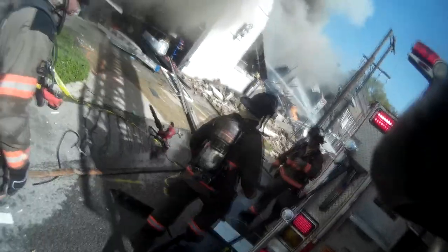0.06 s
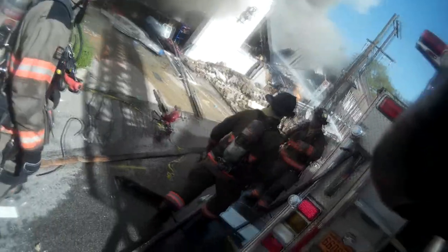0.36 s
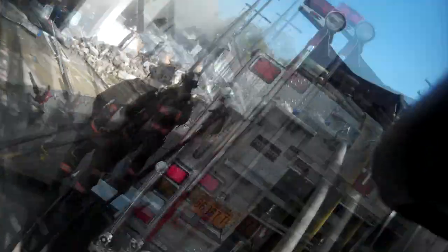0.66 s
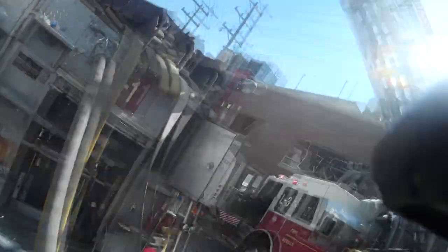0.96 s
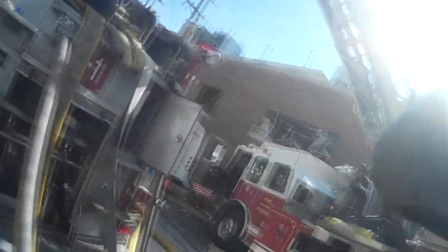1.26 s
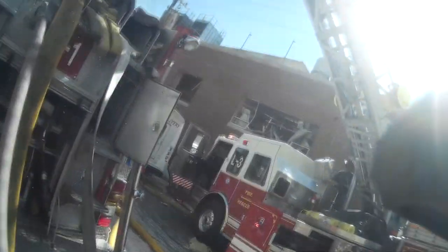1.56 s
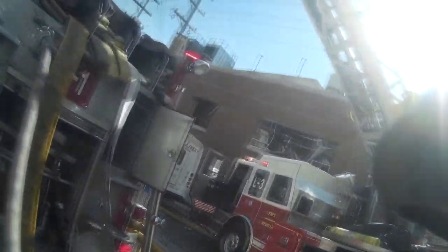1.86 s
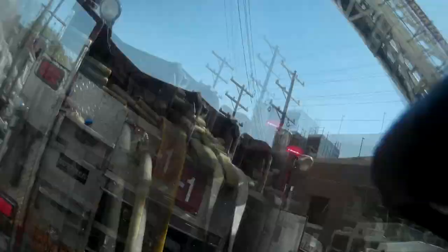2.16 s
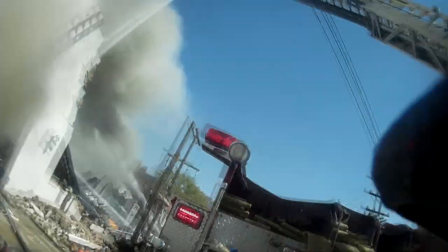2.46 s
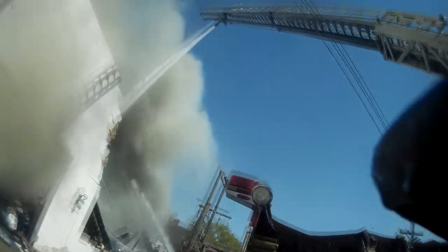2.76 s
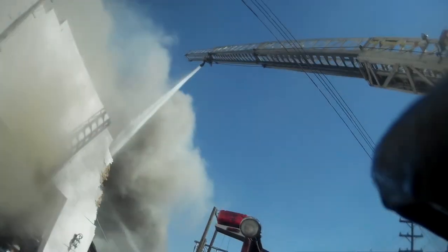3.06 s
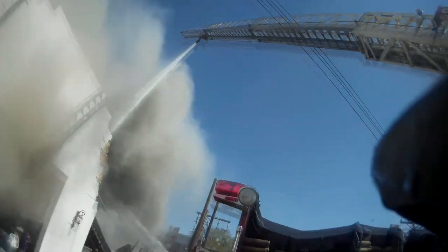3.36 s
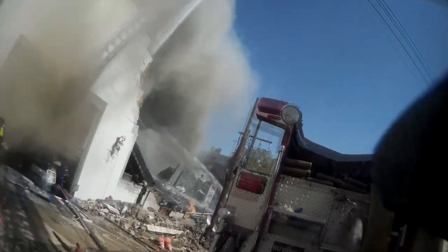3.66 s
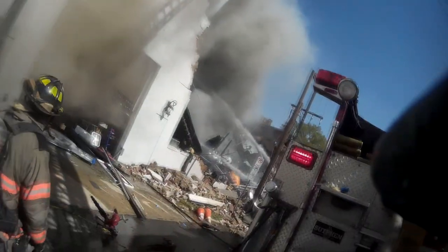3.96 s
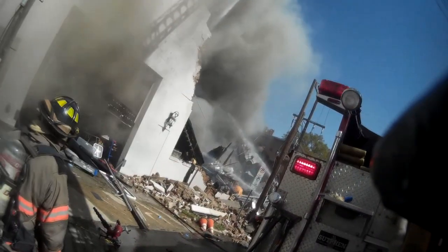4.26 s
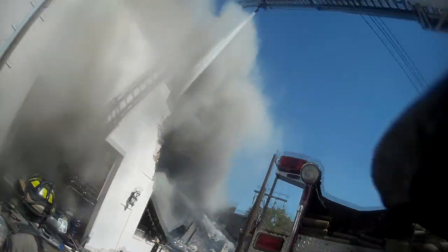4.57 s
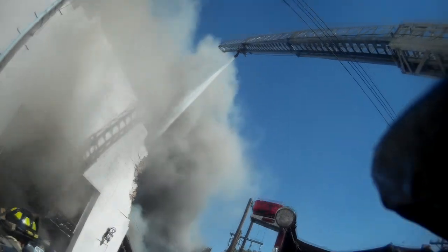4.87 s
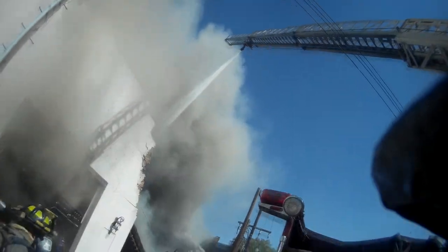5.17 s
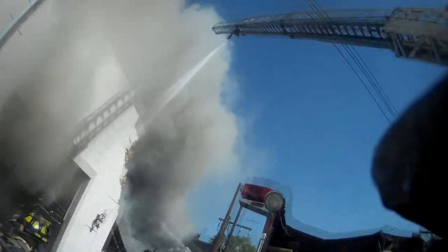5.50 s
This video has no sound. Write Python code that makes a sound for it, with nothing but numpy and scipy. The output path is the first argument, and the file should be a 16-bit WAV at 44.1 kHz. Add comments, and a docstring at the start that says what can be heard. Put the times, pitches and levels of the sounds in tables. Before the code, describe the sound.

Two diesel fire engines idle fast beside a burning building, their low drone throbbing over rumble, clatter and a steady pump hum. A thin gear whine dips after about a second and returns stronger midway. Equipment clinks lightly, a faint, shrill alarm buzzer comes and goes, and a distant hose hisses. The body-worn microphone turns, shifting the tone a little, and everything is on the right channel only.

```python
"""Beside a burning building, two six-cylinder diesel fire engines idle fast to drive their water pumps.
Their exhaust notes drift in and out of step and throb, over rumble, injector clatter, a pump hum and
whining gears. Equipment clinks, a faint, shrill alarm buzzer comes and goes, and a distant hose hisses.
The microphone is worn by someone who turns from the fire to the trucks and back, so their body
shields each sound by a changing amount. Everything is heard on the right channel only."""
import sys
import numpy as np
from scipy import signal
from scipy.fft import rfft, irfft
from scipy.io import wavfile

SR = 44100
rng = np.random.default_rng(int(sys.argv[2]) if len(sys.argv) > 2 else 0)


def output_pcm(signal):
    """Save a mono or channel-first signal as 16-bit PCM at the path in sys.argv[1].

    Samples are clipped to [-1, 1] before scaling.
    """
    pcm = np.clip(np.atleast_2d(signal).T, -1, 1) * 32767
    wavfile.write(sys.argv[1], SR, np.round(pcm).astype(np.int16))


N = 248459
TIME = np.arange(N) / SR
NEAR_CYCLE_HZ, FAR_CYCLE_HZ = 10.445, 10.295  # one engine cycle is two turns of the shaft

# exhaust tones of each engine: (multiple of the cycle rate, level [dB])
NEAR_EXHAUST_TONES = [(4, -59), (6, -36.5), (7, -61), (8, -61), (9, -50), (10, -52.5), (12, -44.5),
                      (13, -53), (17, -61)]
FAR_EXHAUST_TONES = [(3, -63.5), (7, -55.5), (8, -54), (9, -44.5), (10, -56.5), (11, -56), (12, -49),
                     (14, -57), (15, -58.5), (18, -51.5), (20, -43), (22, -65.5), (24, -68.5), (28, -58.5),
                     (29, -49), (30, -52), (32, -52.5), (40, -61), (60, -74.5)]
# slow change in the near exhaust as the wearer moves: (time [s], level change [dB])
NEAR_EXHAUST_LEVEL = [(0, 0), (1.3, 1.8), (2.3, 2.5), (2.9, 3), (3.6, 1), (4.1, 0), (5.63, 2)]
# tone colours of the engine noises: (frequency [Hz], relative level [dB])
RUMBLE_COLOUR = [(8, -18), (25, -13.5), (45, -6.5), (70, -4.5), (105, -5.5), (128, -3), (155, -3), (220, 0),
                 (295, -5.5), (350, -13), (450, -25)]
BLOCK_COLOUR = [(260, -6), (350, 2.5), (440, 2), (550, -2), (680, -9.5), (820, -20.5), (1200, -41)]
CASING_COLOUR = [(600, -31.5), (820, -13), (1000, -7.5), (1150, -2), (1300, 0.5), (1450, -0.5), (1600, -5),
                 (1750, -4.5), (1900, -16.5), (2300, -35.5)]
COVER_COLOUR = [(1600, -19.5), (1850, -5), (2000, -2), (2150, -2), (2380, -8.5), (2580, -6), (2720, -17.5),
                (2900, -31.5), (3100, -42)]
INJECTOR_COLOUR = [(2900, -23.5), (3100, -13), (3380, 1), (3750, -4.5), (4050, -11), (4500, -29)]
# main gear whine, well shielded when the wearer faces the trucks: (time [s], level [dB])
WHINE_LEVEL = [(0, -51.5), (0.4, -56.5), (0.76, -61), (1.1, -69), (2.27, -65), (2.39, -55), (2.68, -54.5),
               (2.8, -49.5), (3.04, -52), (3.26, -52.3), (3.52, -52.5), (4.0, -57), (4.27, -54.5),
               (4.55, -53.5), (4.85, -53), (5.2, -53), (5.63, -53.3)]
# weaker gear tones: (multiple of the tooth rate, level facing trucks [dB], level facing fire [dB])
GEAR_TONES = [(1, -68, -76.5), (3, -71, -78.5), (4, -72.5, -76), (5, -99, -88)]
# the other truck's gear whine: (time [s], level [dB])
OTHER_WHINE_LEVEL = [(0, -80), (0.35, -60.5), (0.95, -60.5), (1.3, -67), (1.9, -60.5), (2.3, -76),
                     (3.05, -69), (3.4, -71)]
# light knocks of equipment: (time [s], pitch [Hz], level [dB], fade time [s])
EQUIPMENT_CLINKS = [(.578, 1730, -50, .008), (0.677, 1300, -44, 0.0055), (0.677, 1680, -46.5, 0.004),
                    (0.737, 1330, -50, .014), (.771, 1470, -55, 0.0092), (.846, 2180, -52, 0.032),
                    (.864, 1900, -55, 0.01), (1.622, 8500, -73, .007), (3.036, 2500, -52, 0.0058),
                    (3.066, 2250, -54, 0.022), (3.06, 7120, -79, .04), (3.092, 1340, -50, .01),
                    (3.494, 3740, -59, 0.011), (3.501, 2190, -53, 0.0055), (3.578, 1290, -52, 0.0058)]
# faint machinery tones: (pitch [Hz], level facing trucks [dB], level facing fire [dB])
MACHINERY_TONES = [(540, -65.5, -63), (861, -67, -76.5), (896, -71, -76.5), (1149, -77, -70.5),
                   (1284, -76, -71), (1641, -73, -69.5), (1810, -70, -74.5), (3900, -89, -86),
                   (3970, -93, -89.5)]
# buzzer blasts: (start [s], level [dB], boost where the buzzer rings most [dB])
BUZZER_BLASTS = [(-.15, -65, 5), (1.87, -66.5, -2), (2.78, -66.5, 2), (3.735, -67, 7.5)]
# overtones that the buzzer's disc lets through: (multiple of the buzz rate, relative level [dB])
BUZZER_TONES = [(50, -9.5), (51, -16), (52, -12), (53, -13.5), (54, -9), (55, -7), (56, -10), (57, -8.5),
                (58, -8.5), (59, -13.5), (60, -16.5)]
# tone colour of the hose stream: (frequency [Hz], relative level [dB])
WATER_COLOUR = [(1000, 0), (3000, 2), (4700, -1.5), (5600, -1.5), (7000, -3), (10000, -5), (13000, -7),
                (15500, -10)]
# the machinery swells and sags together: (time [s], level change at depth 1 [dB])
SHARED_SWELL = [(0.0, -4), (0.22, -2.1), (0.42, 2), (0.52, -1), (0.6, 1), (0.7, -4), (0.76, 1.5),
                (0.81, -1), (0.9, 1), (1.1, 0.5), (1.45, 1), (1.8, -0.5), (1.99, 2), (2.16, -1.5), (2.3, 0),
                (2.51, 0.5), (2.7, -1.3), (2.8, -3.5), (2.88, 0.5), (3.08, 1.5), (3.27, -3), (3.39, -2.5),
                (3.49, 0.5), (3.98, -0.4), (4.11, 0), (4.23, -3.5), (4.38, -1.1), (4.57, 3), (4.66, 0.5),
                (4.78, 0), (5.08, -1), (5.18, -2.5), (5.41, 2), (5.58, -1.3)]
# which way the wearer faces: (time [s], direction [0 = fire, 1 = trucks])
WEARER_TURN = [(.6, 0.16), (1.0, 0.88), (2.15, 0.4), (2.4, 0)]


def exhaust(cycles, tones, waver_db, shake=0.25):
    """Unequal cylinders make a stack of tones; uneven burning shakes all but the firing note."""
    sound = 0
    for multiple, db in tones:
        depth = 0 if multiple == 6 else shake  # six firings per cycle make the firing note
        level = undb(db + waver_db * wander(6.1)) * (1 + depth * wander(13.2))
        sound += level * tone(multiple * cycles + depth * wander(9) / (2 * np.pi))
    return sound


def both_exhausts(near_cycles, far_cycles, throb_hz=0.95, throb_db=0.7, first_peak_s=0.25):
    """The two exhausts drone; the near one throbs as their firing notes go in and out of step."""
    throb = undb(throb_db * np.cos(2 * np.pi * throb_hz * (TIME - first_peak_s)))
    near_level = throb * undb(curve(NEAR_EXHAUST_LEVEL)) * swell(depth=0.5)
    near = near_level * exhaust(near_cycles, NEAR_EXHAUST_TONES, waver_db=0.46)
    far = swell(depth=0.45) * exhaust(far_cycles, FAR_EXHAUST_TONES, waver_db=1.76)
    return near + far


def engine_noise(cycles, scatter_db=0.6):
    """Exhaust gas and the engine block rumble; injectors and valves strike and make the metal ring."""
    puffs = 1 + 0.31 * np.cos(2 * np.pi * 6 * cycles)  # one puff per firing
    strikes = 1 + 0.13 * np.cos(2 * np.pi * 12 * cycles)  # two strikes per firing
    strikes *= undb(scatter_db * wander(63))
    # bass bends round the wearer, so turning does not change it
    rumble = undb(-41) * swell(depth=0.97) * colour(noise() * puffs, RUMBLE_COLOUR)
    block_level = facing(trucks_db=-52.5, fire_db=-49.5) * swell(depth=1) * undb(wander(24))
    block = block_level * colour(noise(), BLOCK_COLOUR)
    clatter = noise() * undb(scatter_db * wander(59))
    casing = facing(trucks_db=-54.5, fire_db=-52) * colour(clatter, CASING_COLOUR)
    covers = facing(trucks_db=-57.5, fire_db=-58.5) * colour(noise() * strikes, COVER_COLOUR)
    injectors = facing(trucks_db=-68, fire_db=-70) * colour(noise() * strikes, INJECTOR_COLOUR)
    shared_shake = swell(depth=1.07) * undb(0.9 * wander(30))
    return rumble + block + shared_shake * (casing + covers + injectors)


def pump(hum_hz=270.1, waver_db=1.0):
    """The pump's spinning blades hum on one steady note."""
    level = facing(trucks_db=-38, fire_db=-33.5) * swell(depth=0.84) * undb(waver_db * wander(18))
    return level * tone(count_cycles(hum_hz, drift=0.00094, rate=6.1))


def gears(engine_cycles, tooth_hz=844.2, boost_db=1.0):
    """Gear teeth whine, mostly at twice the rate they meet; the unevenly turning shaft adds a wobble."""
    wobble = 0.0185 * np.sin(2 * np.pi * 4 * engine_cycles)
    teeth = count_cycles(tooth_hz, drift=0.00088, rate=12.7)
    whine = undb(boost_db + curve(WHINE_LEVEL)) * swell(depth=1.2) * tone(2 * (teeth + wobble))
    weak_tones = sum(facing(trucks_db, fire_db) * tone(multiple * teeth)
                     for multiple, trucks_db, fire_db in GEAR_TONES)
    flutter = 1 + 0.15 * wander(60)
    return (whine + weak_tones) * flutter


def other_gears(whine_hz=1715, waver_db=0.5):
    """The other truck's gears whine a little higher and beat against the main whine."""
    level = undb(curve(OTHER_WHINE_LEVEL) - waver_db * wander(14))
    return level * tone(count_cycles(whine_hz, drift=0.0013, rate=15))


def clinks(rise_s=0.004, spread=0.077):
    """Each light, cushioned knock rings in a narrow band of pitches and dies quickly."""
    band_shape = [(-2, -26), (-0.5, 0), (0.5, 0), (2, -26)]  # (steps from the pitch, level [dB])
    sound = 0
    for time_s, hz, db, fade_s in EQUIPMENT_CLINKS:
        band = [(hz * np.exp(steps * spread), band_db) for steps, band_db in band_shape]
        age = TIME - time_s
        level = undb(db) * np.clip(1 + age / rise_s, 0, 1) * np.exp(-np.abs(age) / fade_s)
        sound += level * colour(noise(), band)
    return sound


def machinery_tones(waver_db=2, flutter=0.3):
    """Faint, fluttering tones, including the pump hum's overtone and a side tone of the gear whine."""
    sound = 0
    for hz, trucks_db, fire_db in MACHINERY_TONES:
        level = facing(trucks_db, fire_db) * undb(waver_db * wander(15)) * (1 + flutter * wander(30))
        sound += level * tone(count_cycles(hz, drift=0.001, rate=10))
    return sound


def buzzer(buzz_hz=62.38, ring_hz=3480, ring_width_hz=110, waver_db=3.0):
    """A distant alarm's disc buzzes in blasts; echoes off the houses make each overtone waver."""
    rise_s, hold_s, fade_s = 0.042, 0.47, 0.057
    cycles = count_cycles(buzz_hz, drift=0.00034, rate=6.9)
    sound = 0
    for multiple, tone_db in BUZZER_TONES:
        near_ring = np.exp(-((multiple * buzz_hz - ring_hz) / ring_width_hz) ** 2)
        blasts = 0
        for start_s, blast_db, boost_db in BUZZER_BLASTS:
            rise = np.clip((TIME - start_s) / rise_s, 0, 1)
            fade = np.exp(-np.maximum(TIME - start_s - hold_s, 0) / fade_s)
            blasts += undb(blast_db + boost_db * near_ring) * rise * fade
        level = blasts * undb(tone_db + waver_db * wander(35))
        sound += level * tone(multiple * cycles + 0.07 * wander(30))
    return sound * swell(depth=0.46)


def water(hiss_db=-70, waver_db=0.5):
    """The distant hose stream hisses almost evenly."""
    return undb(hiss_db + waver_db * wander(14)) * swell(depth=0.2) * colour(noise(), WATER_COLOUR)


def facing(trucks_db, fire_db):
    """Volume of a sound that the wearer's body shields more or less as they turn."""
    return undb(fire_db + (trucks_db - fire_db) * curve(WEARER_TURN))


def swell(depth):
    """Volume of a layer that follows the shared swell; depth 1 follows it exactly."""
    return undb(depth * curve(SHARED_SWELL))


def count_cycles(hz, drift, rate):
    """Running count of cycles for something whose speed strays a little around `hz`."""
    return rng.random() + np.cumsum(hz * (1 + drift * wander(rate))) / SR


def wander(rate, points=2048):
    """Smooth random drift of typical size 1 that changes direction about `rate` times a second."""
    smoother = signal.butter(2, min(rate / 2, 90), fs=points * SR / N, output="sos")
    slow = signal.sosfilt(smoother, rng.standard_normal(2 * points))
    return np.interp(np.arange(N) * points / N, np.arange(points), unit(slow[points:]))


def colour(sound, points):
    """Shape a sound with a tone colour table; the result has strength 1."""
    hz, db = np.transpose(points)
    freqs = np.maximum(np.fft.rfftfreq(N, 1 / SR), 1)
    octaves_outside = np.maximum(np.maximum(np.log2(hz[0] / freqs), np.log2(freqs / hz[-1])), 0)
    shape_db = np.interp(np.log(freqs), np.log(hz), db) - 30 * octaves_outside
    return unit(irfft(rfft(sound) * undb(shape_db), N))


def tone(cycles):
    """A pure tone of strength 1 that starts at a random point in its wave."""
    return np.sqrt(2) * np.sin(2 * np.pi * (cycles + rng.random()))


def noise():
    """White noise: an even hiss."""
    return rng.standard_normal(N)


def curve(points):
    """Join (time [s], value) points with straight lines, one value per sample."""
    return np.interp(TIME, *np.transpose(points))


def undb(db):
    """Turn decibels into a volume multiplier."""
    return 10 ** (np.asarray(db) / 20)


def unit(sound):
    """Scale to an average strength (rms) of 1."""
    return sound / np.sqrt(np.mean(sound ** 2))


def scene():
    """Both fire engines and the sounds around them, with the left channel silent."""
    near_cycles = count_cycles(NEAR_CYCLE_HZ, drift=0.0036, rate=3.2)
    far_cycles = count_cycles(FAR_CYCLE_HZ, drift=0.00089, rate=2.75)
    engines = both_exhausts(near_cycles, far_cycles) + engine_noise(near_cycles)
    machinery = pump() + gears(far_cycles) + other_gears() + machinery_tones()
    background = buzzer() + clinks() + water()
    return np.array([np.zeros(N), 2 * (engines + machinery + background)])


def record(dry):
    """A steep filter cuts off the highest treble."""
    cutoff_hz = 15300
    return signal.sosfilt(signal.ellip(10, 0.1, 80, cutoff_hz, fs=SR, output="sos"), dry)


dry = scene()
out = record(dry)
output_pcm(out)
```